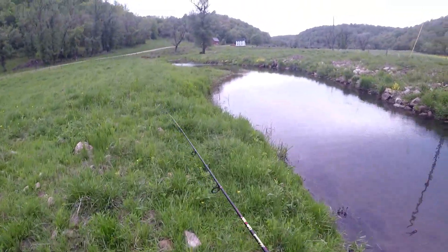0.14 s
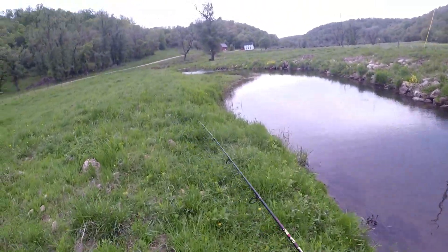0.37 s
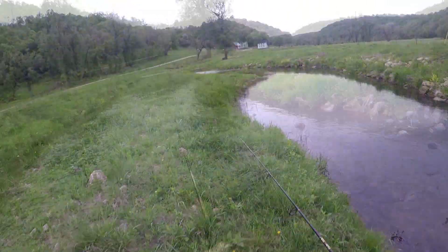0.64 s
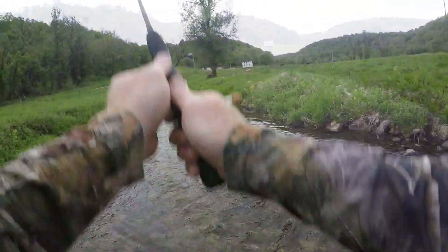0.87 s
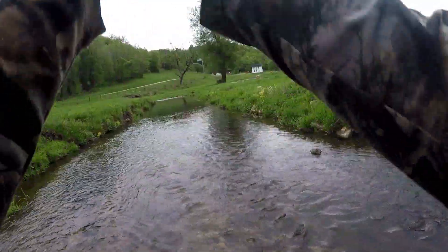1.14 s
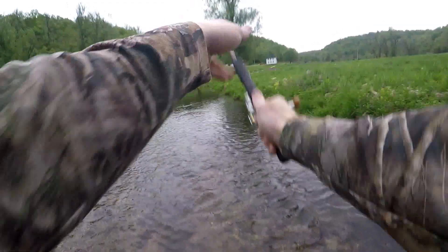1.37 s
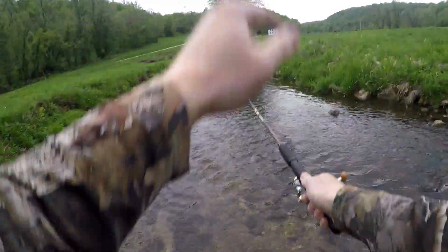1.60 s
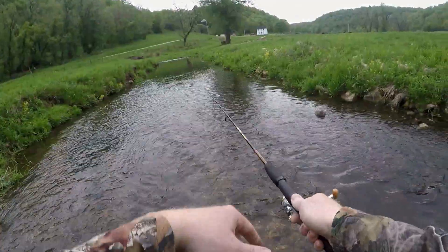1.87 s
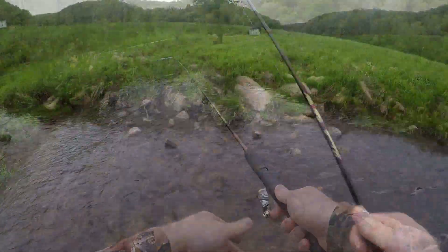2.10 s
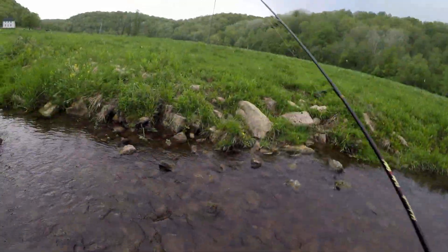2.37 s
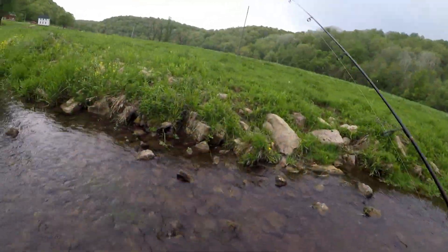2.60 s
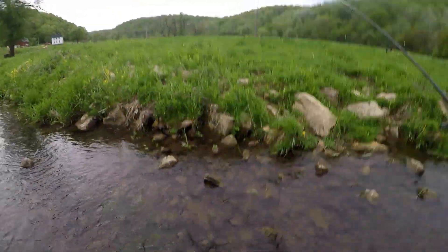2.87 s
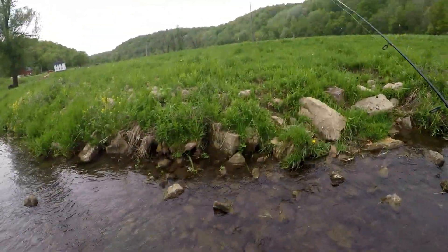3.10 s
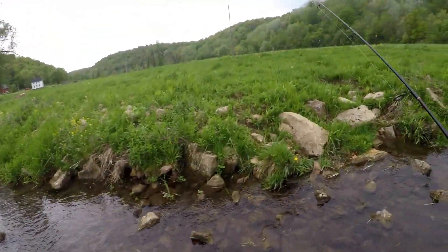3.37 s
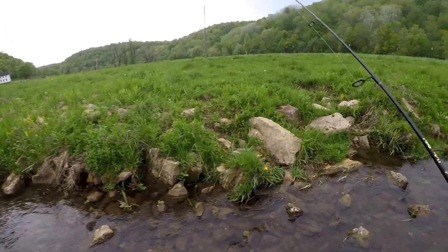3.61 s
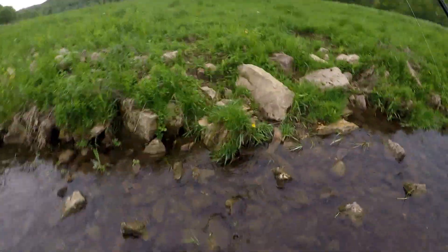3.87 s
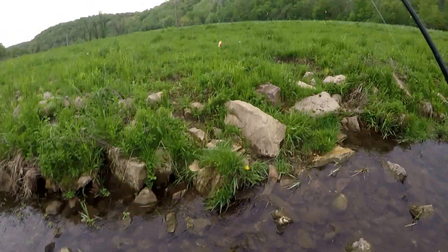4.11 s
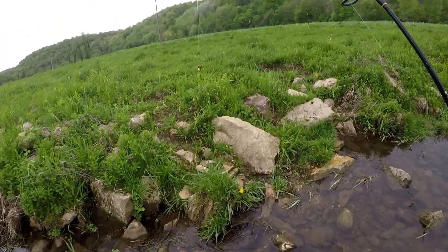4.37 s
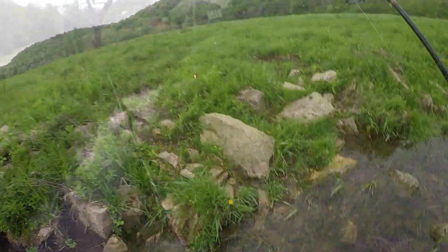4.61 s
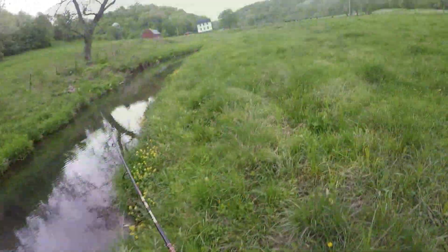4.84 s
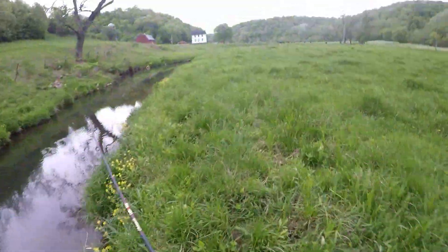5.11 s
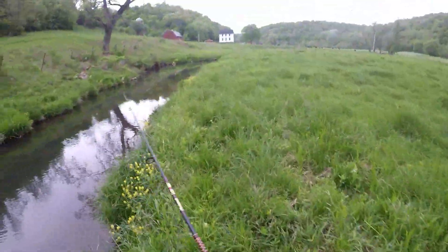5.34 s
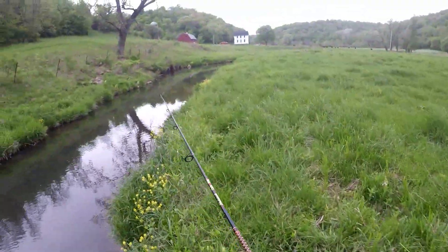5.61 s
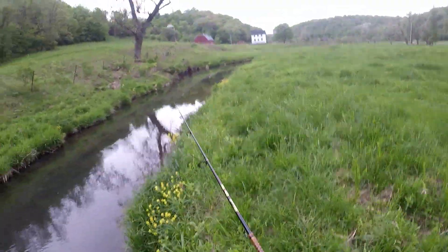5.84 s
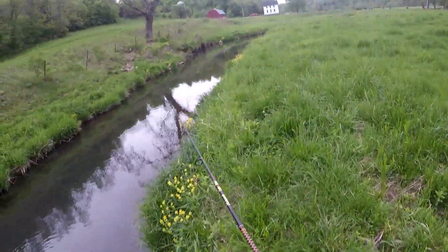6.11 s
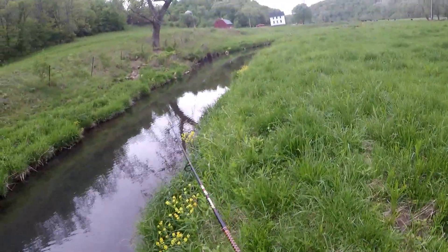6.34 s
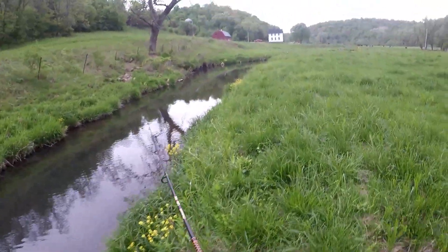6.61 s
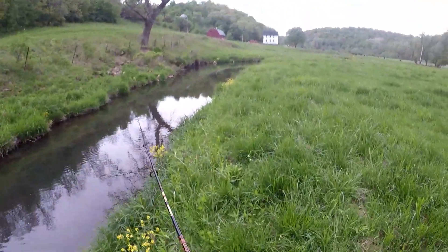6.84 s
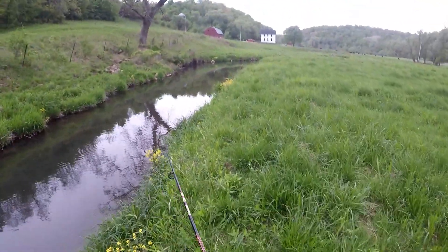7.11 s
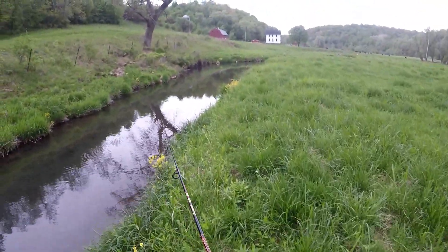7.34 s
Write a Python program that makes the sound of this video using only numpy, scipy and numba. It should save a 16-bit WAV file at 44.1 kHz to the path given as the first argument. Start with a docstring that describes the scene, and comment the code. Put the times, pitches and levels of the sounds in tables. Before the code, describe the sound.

Outdoors beside a stream, heard from an angler's chest, close and dry. From 0 to about 0.8 s, strong low wind rumbles and thumps the microphone while legs swish through wet grass with tiny snaps; small birds whistle, with short trills near 1.1 and 1.3 s. Around 1.4 s the rod cuts the air with a quick swish and sleeve rub, a knock at 1.5 s, then line runs out as a thin, high hiss sinking until about 2.2 s, with faint ticks and a high bird note. From 2.2 to 5 s boots wade through shallow water: splashes around 2.6, 2.8, 3.5, 3.9 and 4.65 s, with patter, bubbling plops and hollow gurgles. From 5 s to the end near 7.5 s, wet grass brushes again in softer sweeps with scattered snaps, gentler wind and sparse bird chirps. A faint riffle hiss continues throughout.

```python
"""An angler by a stream, heard at the chest: steps swish through wet grass as dense small slaps of filtered
impacts, a rod swishes in the cast, then line runs out as a hiss whose narrow band sinks. Boots wade and splash
through shallow water, built from spray noise and swarms of decaying sinusoids for bubbles, then grass again.
All along, shaped low noise makes wind thump the microphone and soft noise makes riffles hiss;
gliding sinusoids make bird song before, during and after the cast, and again on the way back in the grass."""
import sys
import numpy as np
from scipy import signal
from scipy.fft import rfft, irfft
from scipy.io import wavfile
from scipy.ndimage import uniform_filter1d
from numba import njit

SR = 44100
rng = np.random.default_rng(int(sys.argv[2]) if len(sys.argv) > 2 else 0)


def natural_amplitude(level_db):
    """Convert a level in decibels to a linear amplitude factor, elementwise."""
    exponent = np.asarray(level_db, float) / 20
    return 10 ** exponent


def wav_record(signal):
    """Record a signal, one row per channel, as 16-bit PCM in the file named by sys.argv[1]."""
    frames = np.transpose(np.atleast_2d(signal))
    bounded = np.clip(frames, -1, 1)
    # unit amplitude maps onto the largest positive 16-bit level
    quanta = np.round(bounded * 32767).astype(np.int16)
    wavfile.write(sys.argv[1], SR, quanta)


N = 329427
T = np.arange(N) / SR


def curve(table):
    """Piecewise-linear interpolation: columns are joined by straight lines and the ends hold."""
    s, *columns = np.transpose(table)
    return [np.interp(T, s, c) for c in columns]


def unit(x):
    """Power normalisation: scale to rms 1."""
    return x / np.sqrt(np.mean(x ** 2))


def colour(x, points):
    """Minimum-phase filtering: a causal filter follows (frequency [Hz], gain [dB]); the output has rms 1."""
    hz, db = np.transpose(points)
    size = 2 ** 15
    bins = np.maximum(np.arange(size // 2 + 1) * SR / size, 1)
    log_gain = np.log(natural_amplitude(np.interp(np.log(bins), np.log(hz), db)))
    # folding the cepstrum onto positive times makes the response causal
    cepstrum = irfft(log_gain)
    cepstrum[1:size // 2] *= 2
    cepstrum[size // 2 + 1:] = 0
    response = irfft(np.exp(rfft(cepstrum)))
    return unit(signal.fftconvolve(x, response)[:N])


def walk(rate):
    """Stepwise random modulation: levels held 1 / rate seconds and slewed, with rms 1."""
    k = int(SR / rate)
    held = np.repeat(rng.standard_normal(N // k + 1), k)
    return unit(uniform_filter1d(held, k // 2 + 1)[:N])


def crackle(per_s, scatter_db, bed_db):
    """Shot noise: random tiny impacts of uneven size over a smooth bed."""
    draw = rng.random((3, N))
    size = natural_amplitude(-scatter_db * np.log(1.02 - draw[1])) * np.sign(draw[2] - .5)
    impacts = (draw[0] < per_s / SR) * size
    return unit(impacts) + natural_amplitude(bed_db) * rng.standard_normal(N)


def patchy(x, flicker_db, rate):
    """Independent band modulation: every octave flickers on its own."""
    spectrum = rfft(x)
    octave = np.log2(np.arange(N // 2 + 1) * SR / N / 125 + 1e-9)  # octaves above 125 Hz
    total = 0
    for k in range(8):
        share = np.clip(1 - abs(np.clip(octave, 0, 7) - k), 0, 1)
        total = total + natural_amplitude(flicker_db * walk(rate)) * irfft(share * spectrum, N)
    return unit(total)


def swells(events, rest_db, sharp):
    """Incoherent addition: two levels rest low, rise to a crest and fall at each event; powers add."""
    s, first_db, second_db, rise, fall = np.transpose(events)[:, :, None]
    ramp = np.clip(np.minimum(1 + (T - s) / rise, 1 - (T - s) / fall), 0, 1)
    shape = ramp ** (2 * sharp)
    return [np.sqrt(natural_amplitude(2 * rest) + natural_amplitude(2 * db[:, 0]) @ shape)
            for db, rest in zip((first_db, second_db), rest_db)]


@njit
def rings(n, start, hz, t60, gain, pitch_rise, swell, sr):
    """Damped resonance: each grain swells over some cycles, rings down and glides up by a share of its pitch."""
    out = np.zeros(n)
    for k in range(len(start)):
        length, phase = int(t60[k] * sr), 0.
        for i in range(min(length, n - start[k])):
            age = i / length
            phase += 2 * np.pi * hz[k] * (1 + pitch_rise * age) / sr
            onset = 1 - np.exp(-i * hz[k] / (sr * swell))
            out[start[k] + i] += gain[k] * np.sin(phase) * 1000. ** -age * onset
    return out


def grains(s, db, hz, t60, pitch_rise, swell):
    """Superposed damped resonances from columns of times, levels, pitches and 60 dB decay times."""
    start = np.clip(s * SR, 0, N - 1).astype(np.int64)
    return rings(N, start, 1. * hz, 1. * t60, natural_amplitude(db), 1. * pitch_rise, 1. * swell, 1. * SR)


def splash(s, db, t60, rise, points):
    """Enveloped noise: bursts swell for a moment and decay exponentially."""
    kicks = np.zeros(N)
    kicks[(s * SR).astype(int)] = natural_amplitude(db)
    age = np.arange(SR // 10) / SR
    shape = 1000. ** (-age / t60) * (1 - np.exp(-age / rise))
    return signal.fftconvolve(kicks, shape)[:N] * colour(rng.standard_normal(N), points)


def glide(notes, wobble, rate, crest, settle, trill=0, steep=1):
    """Frequency modulation: unsteady tones slide to their last pitch within the settle share of their length.
    They are loudest around the crest share; steep edges hold that level."""
    trill_hz = 62
    out = 0
    for start, length, from_hz, to_hz, db in notes:
        age = (T - start) / length
        edge = np.minimum(age / crest, (1 - age) / (1 - crest))
        gate = np.sqrt(np.clip(steep * edge, 0, 1))
        hz = from_hz + (to_hz - from_hz) * np.clip(age / settle, 0, 1)
        bend = 1 + trill * np.sin(2 * np.pi * trill_hz * T) + wobble * walk(rate)
        tone = np.sin(2 * np.pi * np.cumsum(hz * bend) / SR)
        out = out + np.sqrt(2) * gate * natural_amplitude(db) * tone
    return out


def stream():
    """Broadband turbulence noise: the smooth, faint hiss of riffles further along the stream."""
    # riffle spectrum: (frequency [Hz], relative density [dB per Hz])
    riffle = [(1000, -7), (3000, -2), (8000, 0.5), (12000, -10), (15500, -18)]
    return natural_amplitude(-57.5) * colour(rng.standard_normal(N), riffle)


def wind():
    """Turbulent pressure at the port: slow swings, quicker buffeting and a flutter that grows faster than the swing."""
    # gusts on the microphone port: (crest [s], slow swing [dB], buffeting [dB], rise [s], fall [s])
    gusts = [(0.02, -14.5, -33.5, 0.11, 0.1), (.25, -14, -44, 0.12, 0.091), (.39, -10.5, -38, 0.075, 0.22),
             (.62, -15, -42, 0.3, 0.28), (.83, -23.5, -46, 0.078, 0.17), (1.2, -35.5, -43, 0.6, .15),
             (1.37, -16, -46, 0.12, 0.075), (1.5, -20.5, -38.5, 0.19, 0.3), (1.74, -31.5, -47, 0.25, 0.25),
             (2.06, -41, -45.5, 0.3, 0.11), (2.62, -30.5, -49, 0.3, 0.26), (2.95, -25, -36.5, 0.31, 0.18),
             (3.39, -24, -49, 0.12, 0.2), (3.71, -29, -32.5, 0.036, 0.13), (3.93, -21.5, -46, 0.27, 0.35),
             (4.68, -28.5, -43, 0.36, 0.48), (5.14, -22, -46, 0.11, 0.15), (5.32, -34, -38.5, 0.071, 0.16),
             (5.97, -26, -50.5, 0.22, 0.45), (6.95, -29, -55, 0.3, 0.22), (7.41, -32, -42.5, 0.18, 0.093)]
    # spectra of swing, buffeting and flutter: (frequency [Hz], relative density [dB per Hz])
    swing_spectrum = [(1.5, -32), (3, 14), (12, 6.5), (22, -10), (34, -8), (60, -59.5)]
    buffet_spectrum = [(18, -2.5), (42, 0.5), (60, 2), (120, -9.5), (250, -43.5)]
    flutter_spectrum = [(12, -37), (24, 8), (40, -2), (60, -13), (120, -67)]
    calm_swing_db, calm_buffet_db = -42, -52
    swing, buffet = swells(gusts, (calm_swing_db, calm_buffet_db), 0.97)
    slow = swing * colour(rng.standard_normal(N), swing_spectrum)
    quick = buffet * colour(rng.standard_normal(N), buffet_spectrum)
    # strong gusts shake the port far more than weak ones
    flutter = natural_amplitude(2) * swing ** 2.1 * colour(rng.standard_normal(N), flutter_spectrum)
    return slow + quick + flutter


def birds():
    """Gliding tones and reverberation: whistles, some trilled, broken up by moving air, echo off the trees."""
    # whistled notes, near and far: (start [s], length [s], from [Hz], to [Hz], nominal level [dB])
    whistles = [(.245, .028, 3150, 2850, -53), (.275, .04, 2880, 3380, -51), (.375, .045, 3650, 3150, -56),
                (.418, .06, 3080, 3300, -50), (.55, .075, 3510, 4040, -51), (.83, .045, 3350, 2650, -56),
                (.94, .04, 2250, 2400, -58), (1.193, .034, 3650, 2750, -53), (1.25, .045, 3000, 3150, -60),
                (1.56, .22, 7050, 7050, -58), (1.62, .018, 5300, 4540, -51), (1.635, .057, 4560, 4780, -51),
                (1.7, .16, 4800, 4550, -65), (5.82, .03, 2620, 2600, -55), (5.905, .07, 3170, 3110, -58),
                (6.4, .1, 2250, 2380, -51), (6.5, .042, 2420, 2050, -50), (6.87, .12, 2580, 2580, -61),
                (6.915, .033, 6250, 5250, -62), (6.998, .024, 6000, 4150, -61),
                (7.055, .028, 6450, 5350, -62), (7.215, .04, 5200, 6300, -62), (7.3, .045, 4680, 3500, -61),
                (7.365, .04, 4950, 6100, -60)]
    # trilled notes that scoop to their pitch early: (start [s], length [s], from [Hz], to [Hz], nominal level [dB])
    trills = [(1.055, .11, 2520, 3090, -51), (1.222, .105, 2800, 3780, -52)]
    song = glide(whistles, .007, 120, .45, 1, 0, 2.5)
    song = song + glide(trills, .006, 120, .6, .37, .03, 3)
    song = natural_amplitude(1 + 1.2 * walk(70)) * song
    age = np.arange(SR // 4) / SR
    echo = rng.standard_normal(len(age)) * 1000. ** (-age / .16)  # 60 dB decay in 0.16 s
    return song + natural_amplitude(-26) * signal.fftconvolve(song, echo)[:N]


def line_out():
    """Quadrature modulation of band noise: the hiss's centre frequency sinks as the line slows."""
    # line hissing through the rod rings, slowing down: (time [s], level [dB], centre [Hz])
    line = [(1.5, -50, 13500), (1.62, -52, 13200), (1.85, -45, 12500), (1.95, -50, 10600),
            (2.08, -59, 8650), (2.2, -77, 7850)]
    db, hz = curve(line)
    lowpass = signal.butter(4, 2000, fs=SR, output="sos")
    band = signal.sosfilt(lowpass, rng.standard_normal((2, N)))
    phase = 2 * np.pi * np.cumsum(hz) / SR
    hiss = unit(band[0] * np.cos(phase) + band[1] * np.sin(phase))
    runs = (T > line[0][0]) & (T < line[-1][0])
    return runs * natural_amplitude(db) * hiss


def ticks():
    """Strongly damped resonance: bright snaps of a few cycles with a fizzy noise tail."""
    # droplets, snapping stems, and faint high ticks of the line or reel near 2 s:
    # (time [s], nominal level [dB], pitch [Hz])
    snaps = [(0.278, -19, 8690), (0.401, -21, 4500), (0.6046, -23, 6000), (0.657, -15, 6400),
             (0.714, -13, 7600), (0.7934, -24, 7530), (1.105, -36, 9500), (1.176, -28, 8000),
             (1.3984, -17.5, 7660), (1.491, -21, 7730), (1.698, -28, 7000), (1.772, -29, 6500),
             (1.906, -32, 6000), (1.955, -31, 13500), (1.996, -32, 13500), (2.02, -30, 12500),
             (2.198, -27, 6500), (2.295, -20, 7740), (2.318, -23, 8500), (2.6767, -0.5, 5500),
             (2.7387, -15, 8720), (2.8008, -7, 8630), (2.834, -2.5, 7000), (2.882, -7, 8400),
             (2.9085, -8.5, 4970), (2.963, -9.5, 8250), (2.995, -15, 7900), (3.006, -21, 9000),
             (3.02, -24, 8000), (3.05, -14, 9000), (3.266, -22, 7570), (3.4908, 0.5, 6140),
             (3.5657, -6, 9050), (3.695, -8, 8990), (3.7324, -12, 5270), (3.952, -11, 11500),
             (3.9583, -4, 8900), (3.97, -17, 12000), (4.024, -12.5, 12500), (4.0443, -10, 7640),
             (4.088, -11.5, 6000), (4.1317, -12, 8800), (4.1968, -9, 6700), (4.201, -15, 13500),
             (4.2944, -9.5, 9110), (4.5897, -5, 6700), (4.6489, 1, 6800), (4.8584, -16, 7280),
             (5.2516, -18, 6010), (5.485, -15.5, 6160), (5.8514, -22, 5100), (5.8997, -11, 6400),
             (6.066, -29, 5600), (6.016, -22, 6900), (6.1627, -23, 4550), (6.2872, -22, 6400),
             (6.305, -18, 4930), (6.308, -12.5, 7000)]
    s, db, hz = np.transpose(snaps)
    tail_spectrum = [(1500, -4.5), (5000, -2), (9000, 5.5), (12500, -11), (15500, -18)]
    fizz = splash(s - .003, db - 10.0, 0.024, 0.0041, tail_spectrum)
    bright = grains(s, db - 3, np.minimum(1.6 * hz, 12500), 9 / hz, 0, 1.2)
    snap = grains(s, db + 6, hz, 11 / hz, 0, 1.2)
    return snap + bright + fizz


def plops():
    """Bubble resonance: knocks start almost at once, bubbles swell slower and rise further in pitch.
    Each has a fainter companion above and a short splash."""
    # single bubbles, plops and knocks: (time [s], nominal level [dB], starting pitch [Hz], nominal ring [cycles])
    drips = [(0.097, -27, 372, 16), (0.401, -19.5, 1260, 6.9), (0.59, -28, 2000, 14), (0.62, -30, 2600, 4),
             (0.715, -28.5, 1370, 24), (0.85, -36, 1900, 24), (1.177, -31, 3000, 4), (1.253, -35, 1890, 24),
             (1.298, -23, 2500, 5.5), (1.367, -21, 3000, 5), (1.43, -29, 260, 29), (1.433, -15, 815, 8.1),
             (1.477, -15, 1600, 7.2), (1.497, -18, 3000, 10), (1.496, -4.5, 1440, 4.3),
             (1.496, -12, 219, 5.3), (2.061, -38.5, 314, 47), (2.082, -21, 2700, 11.5),
             (2.267, -21.5, 2350, 23), (2.34, -27, 740, 29), (2.357, -23.5, 285, 15.5),
             (2.395, -25, 743, 30), (2.445, -28, 1170, 44), (2.428, -13.5, 1530, 13),
             (2.465, -9, 2540, 10.6), (2.487, -18.5, 420, 15.6), (2.506, -15, 2780, 13),
             (2.548, -12.5, 1130, 13), (2.602, -5, 2220, 5.9), (2.611, -25, 579, 17), (2.664, -19, 894, 25),
             (2.741, -24.5, 209, 12), (2.786, -12.5, 1260, 9.2), (2.799, -12, 1520, 15),
             (2.836, -8, 1350, 10.4), (2.91, -7, 1920, 4.7), (2.926, -20, 768, 26), (2.939, -21, 740, 20),
             (2.962, -22.5, 148, 5), (2.987, -22.5, 1030, 30), (3.09, -25, 2500, 27),
             (2.969, -17.5, 1160, 11.4), (3.049, -18.5, 740, 11), (3.076, -16.5, 1230, 26),
             (3.079, -17, 474, 8.4), (3.107, -23, 1120, 37), (3.153, -26, 2820, 34), (3.188, -26, 1830, 27),
             (3.198, -25, 3380, 30), (3.204, -20.5, 940, 24), (3.217, -24, 2050, 28),
             (3.492, -20, 2360, 8.1), (3.534, -26, 3000, 13), (3.576, -6.5, 1148, 31),
             (3.694, -12, 229, 6.5), (3.728, -16, 197, 8.9), (3.809, -11, 465, 7.2), (3.825, -6, 2030, 9),
             (3.85, 4.5, 1120, 5.8), (3.956, -12.5, 675, 11), (3.96, -18.5, 590, 36),
             (4.054, -17, 1090, 13), (4.152, -18, 2280, 23), (4.183, -14.5, 1140, 15),
             (4.186, -24, 534, 25), (4.233, -17.5, 810, 15), (4.253, -11.5, 2500, 14),
             (4.269, -14, 670, 27), (4.4, -11.5, 760, 24), (4.433, -19.5, 270, 11), (4.494, -21, 526, 14),
             (4.554, -10, 1120, 9.4), (4.563, -16, 423, 12), (4.595, -12, 910, 10.6),
             (4.615, -12, 246, 9.8), (4.641, -3.5, 1900, 6.5), (4.665, -15, 2520, 27),
             (4.678, -17, 336, 15.5), (4.788, -19, 1900, 14), (4.796, -14, 497, 5.3),
             (4.871, -26, 1025, 25), (4.895, -27, 890, 21), (5.295, -8.5, 2900, 6.5),
             (5.362, -23.5, 187, 8), (5.852, -23, 1760, 9.8), (5.897, -15, 3220, 1.9),
             (5.986, -19.5, 880, 4.8), (6.013, -25, 950, 8.4), (6.015, -10.5, 2860, 15),
             (6.98, -25, 1800, 4.3)]
    s, db, hz, cycles = np.transpose(drips)
    t60 = np.clip(cycles, 2, 45) / hz
    airy = cycles >= 16  # longer rings are air bubbles, shorter ones knocks
    tone = grains(s + 0.0045, db - 5.5, 1.76 * hz, 0.22 * t60, 0.27, 0.11)
    for kind, boost_db, pitch_rise, swell in ((~airy, 2.5, .19, .8), (airy, 5.5, .45, 2.6)):
        tone = tone + grains(s[kind], db[kind] + boost_db, hz[kind], 1.055 * t60[kind], pitch_rise, swell)
    return tone + splash(s, db - 15, .02, .002, [(200, -20), (900, 0), (3000, -6), (15000, -25)])


def grass():
    """Impact and friction noise: wet blades whip past in dense small slaps, a few flick louder; cloth rubs below.
    The swish of the cast has the same make."""
    # legs in grass, sleeves on the jacket, and the swish of the cast near 1.4 s:
    # (crest [s], blade rustle [nominal dB], cloth brush [nominal dB], rise [s], fall [s])
    swishes = [(.05, -63, -43, 0.53, 0.061), (.122, -44.5, -43, 0.021, 0.094),
               (.31, -36.5, -42, 0.13, 0.17), (.42, -45, -44, .1, 0.12), (.55, -44.5, -44, 0.081, 0.1),
               (.662, -48, -45, 0.12, 0.05), (.716, -38.5, -43.5, 0.0083, 0.036),
               (.8, -48, -48.5, 0.039, 0.018), (.97, -50.5, -70, 0.1, .08), (1.13, -50, -70, 0.024, .05),
               (1.184, -69, -58, .01, 0.14), (1.325, -45, -48, 0.014, 0.038),
               (1.4, -31.5, -40.5, 0.051, 0.036), (1.428, -30.5, -34, 0.024, 0.032),
               (1.49, -39, -36, 0.03, 0.024), (1.53, -43, -50.5, 0.025, 0.056),
               (1.578, -42, -52, .02, 0.11), (1.69, -56, -74, .05, .3), (2.082, -65, -51, 0.14, 0.028),
               (2.2, -107, -63, 0.028, .2), (5.12, -39, -49.5, 0.52, 0.036),
               (5.25, -39.5, -46, .012, 0.045), (5.372, -43, -46, 0.048, 0.045),
               (5.56, -43.5, -50, 0.18, .15), (5.89, -41.5, -50.5, 0.39, 0.054),
               (5.93, -49, -54, .01, 0.12), (6.018, -45, -40.5, 0.011, 0.0055),
               (6.306, -39, -48, 0.012, 0.036), (6.45, -36.5, -48.5, 0.22, 0.22),
               (6.77, -42, -48, 0.17, 0.22), (6.944, -48, -48, 0.029, 0.029),
               (7.0, -52, -44.5, 0.034, 0.043), (7.45, -44, -48, 0.49, .2)]
    # spectra of blades and cloth: (frequency [Hz], relative density [dB per Hz])
    blade_spectrum = [(1290, -21.5), (2200, -6), (3870, -7.5), (8540, -3), (14200, -11), (15500, -6.5)]
    cloth_spectrum = [(50, 0.5), (110, -3), (450, -3), (700, -6), (1600, -10.5), (3000, -15), (4500, -30.5),
                      (8000, -37.5)]
    still_blade_db, still_cloth_db = -56, -52
    rustle, brush = swells(swishes, (still_blade_db, still_cloth_db), 0.71)
    away = np.interp(T, [2.2, 2.4, 4.8, 4.95], [1, 0, 0, 1])  # silent while in the water
    blades = patchy(colour(crackle(3300, 7.6, 2.3), blade_spectrum), 2.6, 17)
    draw = rng.random((260, 3)).T
    hz = 2600 * 2 ** (2.3 * draw[1])
    flicks = grains(draw[0] * N / SR, 6 + 11 * draw[2], hz, 20 / hz, .06, 2)
    cloth = natural_amplitude(3.5) * patchy(colour(crackle(900, 1.4, 0.36), cloth_spectrum), 2.65, 19)
    return away * (rustle * (blades + flicks) + brush * cloth)


def wading():
    """Bubble resonance over turbulence: spray fizzes, droplets patter and tiny bubbles chirp on top.
    Below, a swarm of bubbles rings and rises in pitch over churning water; short hollow tones join in."""
    # boots pushing and slapping through water:
    # (crest [s], spray [nominal dB], gurgle [nominal dB], rise [s], fall [s])
    surges = [(2.3, -45, -37, 0.062, 0.18), (2.42, -40.5, -33, 0.11, 0.069),
              (2.52, -29.5, -29.5, 0.14, 0.11), (2.62, -29, -30.5, 0.15, 0.18),
              (2.68, -33, -22.5, .015, 0.032), (2.81, -25, -27.5, 0.031, 0.0059),
              (2.83, -24.5, -36, 0.015, 0.051), (2.95, -55, -33, .02, 0.068), (3.1, -40, -31.5, 0.29, 0.55),
              (3.33, -35.5, -53, 0.093, 0.11), (3.42, -41.5, -56, 0.11, 0.086),
              (3.497, -23, -33, 0.018, 0.025), (3.57, -29, -46, 0.087, 0.1), (3.66, -32.5, -36, 0.17, 0.94),
              (3.86, -20, -21, 0.077, 0.02), (3.9, -42, -26.5, 0.074, 0.073),
              (3.96, -32, -23, 0.04, 0.0075), (4.02, -52, -29.5, 0.079, 0.12),
              (4.05, -31.5, -36, 0.0093, 0.048), (4.18, -41, -30, 0.18, 0.14),
              (4.28, -38.5, -25.5, 0.11, 0.071), (4.4, -33.5, -26.5, 0.21, 0.35),
              (4.55, -35, -29.5, 0.033, 0.1), (4.66, -21, -25, .16, 0.16), (4.8, -33.5, -37, .05, 0.1)]
    # short hollow tones: a chirp just after the cast, then gurgles behind wading boots:
    # (start [s], length [s], from [Hz], to [Hz], nominal level [dB])
    hollow_tones = [(1.575, 0.046, 557, 896, -50), (2.31, 0.084, 227.4, 302, -39),
                    (3.002, .032, 738, 740, -36), (3.095, 0.065, 316, 270, -42.5),
                    (3.19, 0.14, 222, 287, -44), (3.41, 0.074, 301, 413, -44.5),
                    (3.81, 0.078, 411, 585, -29.5), (4.303, .018, 1050, 1445, -22)]
    # spectra of spray and churning water: (frequency [Hz], relative density [dB per Hz])
    spray_spectrum = [(880, -20), (1500, -0.5), (1900, 0), (2970, 0), (3250, 0.5), (4000, -4.5), (5000, -1),
                      (7980, 0), (12700, -9), (15500, -14)]
    gurgle_spectrum = [(59, -26), (100, -6.5), (160, -6), (242, -6.5), (673, -3.5), (1020, 0), (1220, -1),
                       (1540, -8.5), (3000, -11), (3900, -18), (6600, -120)]
    first, last = 2.15, 5.0  # in the water [s]
    ripple_spray_db, ripple_gurgle_db = -50, -44.5
    fizz, churning = swells(surges, (ripple_spray_db, ripple_gurgle_db), 0.73)
    near = np.interp(T, [first - .1, first, last, last + 0.018], [0, 1, 1, 0])

    spray = natural_amplitude(1.6 * walk(40)) * patchy(colour(crackle(3000, 4.5, -2), spray_spectrum), 2, 24)
    draw = rng.random((1300, 3)).T
    hz = 3500 * 2 ** (2 * draw[1])
    size_db = 7 - 5.6 * np.log(1.03 - draw[2])
    drops = grains(first + draw[0] * (last - first), size_db, hz, 20 / hz, .15, 2.2)

    draw = rng.random((700, 4)).T
    hz = 1300 * 2 ** (1.9 * draw[1])
    size_db = -4 * np.log(1.04 - draw[2])
    tiny = grains(first + draw[0] * (last - first), size_db, hz, (20 + 30 * draw[3]) / hz, .3, 3)

    draw = rng.random((900, 4)).T
    hz = 300 * 2 ** (3.4 * draw[1])
    size_db = -4.5 * np.log(1.05 - draw[2]) - .8 * abs(np.log2(hz / 900))  # strongest near 900 Hz
    swarm = grains(first + draw[0] * (last - first), size_db, hz, (14 + 35 * draw[3]) / hz, .4, 3)
    churn = patchy(colour(crackle(1200, 4.0, 1.2), gurgle_spectrum), 4, 30)

    gurgle = natural_amplitude(-3.0) * swarm + natural_amplitude(-3.5) * churn
    water = fizz * (natural_amplitude(-2.0) * spray + drops + natural_amplitude(2.5) * tiny) + churning * gurgle
    hollow = natural_amplitude(2 + 2 * walk(50)) * glide(hollow_tones, .02, 60, .6, 1)
    return near * water + hollow


def scene():
    """Linear superposition: the pressures of all sources add in open air, with no room around them."""
    mix = stream() + wind() + birds() + line_out() + ticks() + plops() + grass() + wading()
    return mix[None]  # one channel


def low_pass(x):
    """Removes everything above the highest recorded frequency."""
    return signal.sosfilt(signal.butter(12, 16320, fs=SR, output="sos"), x)


def record(dry):
    """Band limitation: the camera's steep elliptic low-pass cuts the top of the spectrum."""
    top_hz = 15350
    lowpass = signal.ellip(8, .3, 36, top_hz, fs=SR, output="sos")  # 0.3 dB ripple, 36 dB stop band
    mix = signal.sosfilt(lowpass, dry)
    return low_pass(mix)


dry = scene()
out = record(dry)
wav_record(out)
```